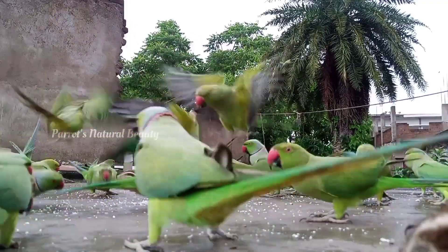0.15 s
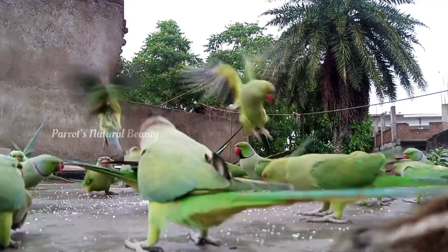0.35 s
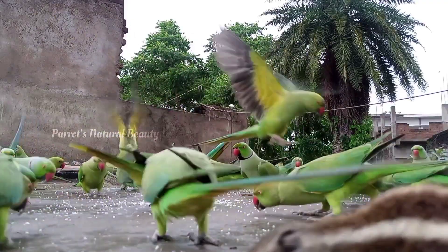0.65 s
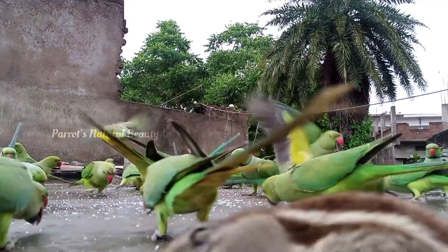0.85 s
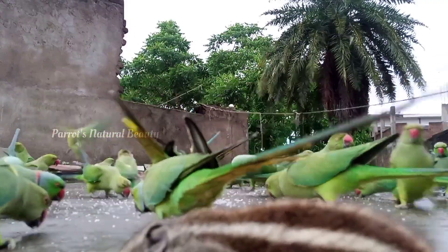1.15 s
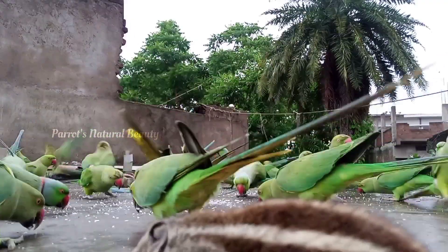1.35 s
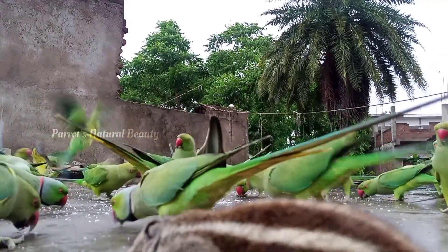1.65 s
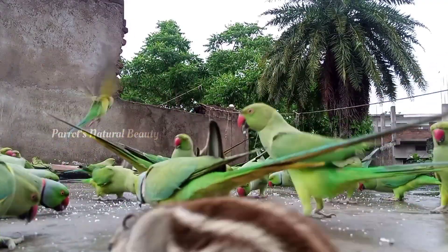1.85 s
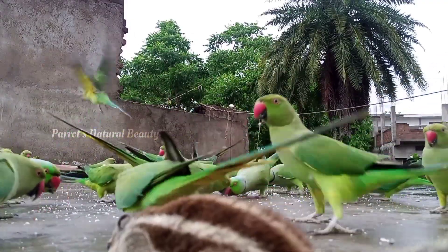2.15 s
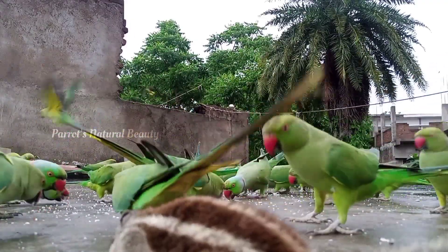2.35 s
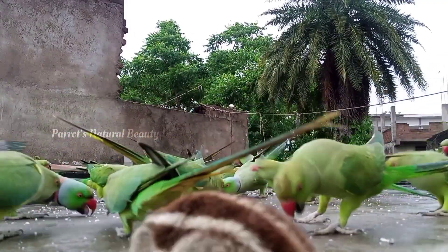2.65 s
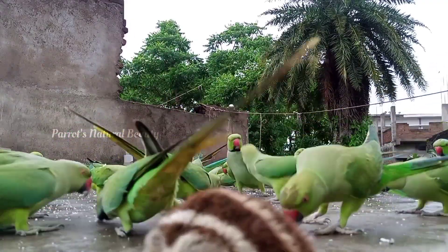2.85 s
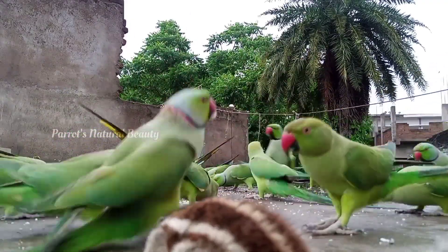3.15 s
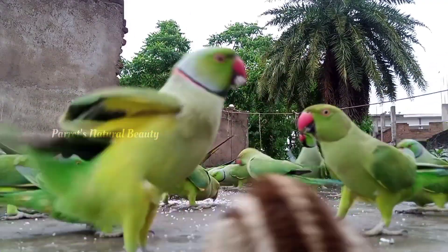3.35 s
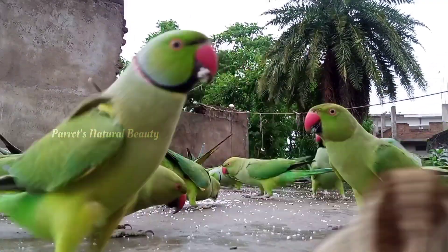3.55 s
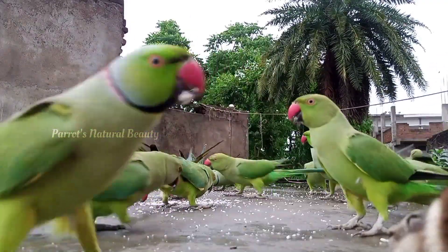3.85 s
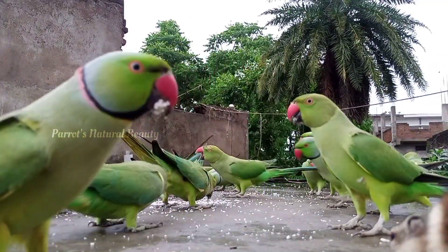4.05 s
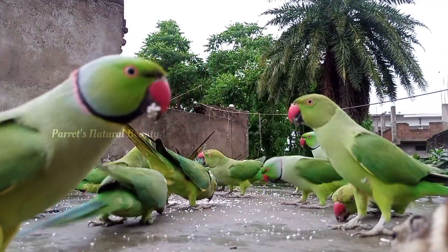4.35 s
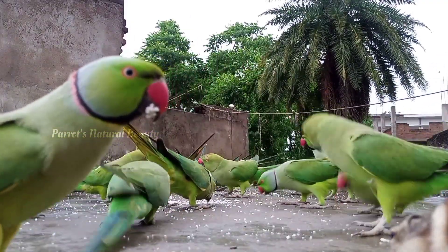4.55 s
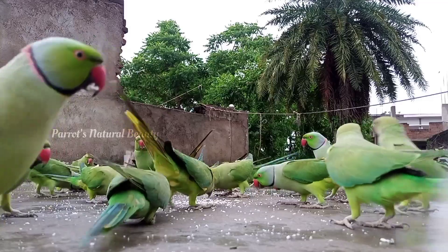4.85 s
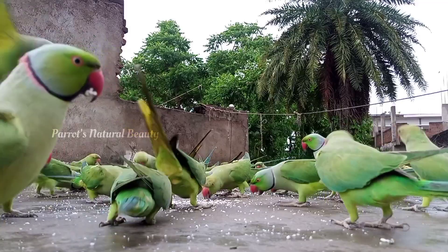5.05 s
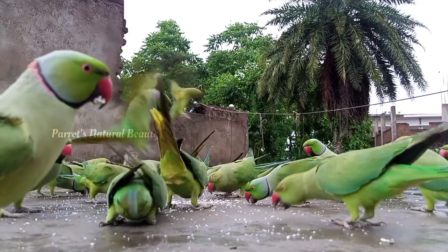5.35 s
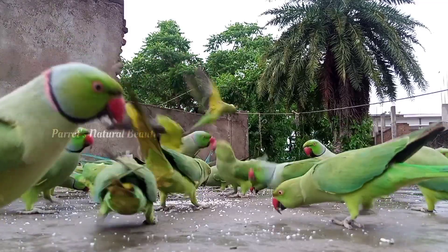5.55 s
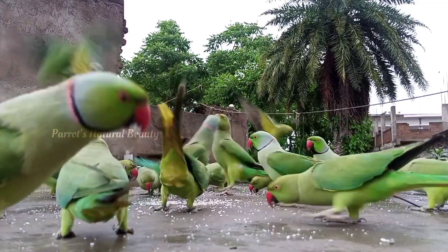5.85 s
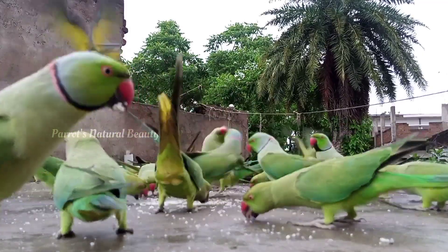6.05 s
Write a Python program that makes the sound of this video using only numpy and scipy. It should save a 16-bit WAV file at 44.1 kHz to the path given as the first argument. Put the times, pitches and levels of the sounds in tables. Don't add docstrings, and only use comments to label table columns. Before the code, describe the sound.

A feeding flock heard by one small microphone set among the birds. Early wing flutter and humming feathers give way to a rasping squawk, then small whistles, a warble and dry husk ticks. The insect whine fades out midway; distant thin cries appear. A burst of wings buffets the microphone with deep thumps, the whine comes back, and low croaks, flaps, a falling screech and a fluttering trill end it.

```python
import sys
import numpy as np
from scipy import signal
from scipy.fft import rfft, irfft, next_fast_len
from scipy.io import wavfile
from scipy.ndimage import uniform_filter1d, map_coordinates

SR = 44100
rng = np.random.default_rng(int(sys.argv[2]) if len(sys.argv) > 2 else 0)


def natural_amplitude(level_db):
    exponent = np.asarray(level_db, float) / 20
    return 10 ** exponent


def wav_out(sig):
    wavfile.write(sys.argv[1], SR, np.round(np.clip(np.atleast_2d(sig).T, -1, 1) * 32767).astype(np.int16))


N = 273420


def unit(x):
    return x / np.sqrt(np.mean(np.abs(x) ** 2) + 1e-20)


def along(points, hz):
    f, v = np.transpose(points)
    return np.interp(np.log(hz + 1), np.log(f + 1), v)


def curves(rows, whole=True):
    s, *cols = np.transpose(rows)
    if whole:
        i = np.arange(N)
    else:
        i = np.arange(int(s[0] * SR), min(N, int(s[-1] * SR)))
    return i, *[np.interp(i / SR, s, c) for c in cols]


def wobble(rate, size=N):
    knots = rng.standard_normal(int(size * rate / SR) + 4)
    return map_coordinates(knots, [np.arange(size) * rate / SR])


def coloured(x, spectrum):
    m = next_fast_len(len(x) + 4096)
    gain = natural_amplitude(along(spectrum, np.fft.rfftfreq(m, 1 / SR)))
    return irfft(rfft(x, m) * gain, m)[:len(x)]


def rush(spectrum, patchy_db):
    z = signal.stft(rng.standard_normal(N), nperseg=512)[2]
    field = uniform_filter1d(rng.standard_normal(z.shape), 6, 0)
    field = uniform_filter1d(field, 8, 1)
    noise = signal.istft(z * natural_amplitude(patchy_db * unit(field)), nperseg=512)[1][:N]
    return unit(coloured(noise, spectrum))


def whistle(pitch, level_db, overtones_db, rough, edge_s=0.0037):
    n = len(pitch)
    phase = 2 * np.pi * np.cumsum(pitch + 90 * rough * wobble(300, size=n)) / SR
    tone = np.zeros(n)
    for k, db in enumerate(overtones_db):
        shake = 1 - 0.56 * rough + rough * (wobble(300, size=n) + 0.31 * wobble(1400, size=n))
        tone += natural_amplitude(db + 4.5) * shake * np.sin((k + 1) * phase)
    nearest_end = np.minimum(np.arange(n), np.arange(n)[::-1])
    return natural_amplitude(level_db) * np.clip(nearest_end / (edge_s * SR), 0, 1) * tone


def glide(s, length, first_hz, last_hz, db, turn, sag, rise_db, fall_db):
    turn = np.clip(turn, .05, .95)
    turn_hz = sag * (first_hz + turn * (last_hz - first_hz))
    start = (s, first_hz, db - rise_db)
    end = (s + length, last_hz, db - fall_db)
    return [start, (s + turn * length, turn_hz, db), end]


def shaped(*flocks):
    calls = []
    for kind, rows in flocks:
        for row in rows:
            corners = glide(*row, kind["turn"], kind["sag"], kind["rise_db"], kind["fall_db"])
            calls.append((corners, kind["overtones_db"], kind["rough"]))
    return calls


MOUTH_HZ = 2050


def sung(calls, dulling=0):
    out = np.zeros(N)
    for corners, overtones_db, rough in calls:
        i, pitch, level_db = curves(corners, whole=False)
        dulled_db = []
        for k, db in enumerate(overtones_db):
            above_hz = np.maximum((k + 1) * pitch - MOUTH_HZ, 0)
            dulled_db.append(db - dulling * above_hz / 1000)
        out[i] += whistle(pitch, level_db, dulled_db, rough)
    return out


# f/Hz, level/dB (per Hz)
TOWN_COLOUR = [(60, -19), (100, -1), (155, 1), (370, -9.5), (800, -14), (1500, -9.5), (2300, -16.5),
               (2900, -22), (3250, -22.5), (3700, -24.5), (4200, -22), (4900, -29), (6400, -32.5),
               (7800, -44), (10000, -73)]
# t/s, level/dB
TOWN_LEVEL = [(0.0, -65), (0.45, -66), (1.5, -67.5), (3.0, -68.5), (3.49, -68.5), (3.78, -67.5),
              (4.73, -68.5), (5.09, -65.5), (5.7, -64.5), (5.94, -64.5), (6.2, -61.5)]


def town():
    _, level_db = curves(TOWN_LEVEL)
    hiss = natural_amplitude(-101 + 2.2 * wobble(28)) * rng.standard_normal(N)
    return natural_amplitude(level_db + 2.0 + wobble(6.6)) * rush(TOWN_COLOUR, patchy_db=2.0) + hiss


# t/s, half width/s, level/dB
GUSTS = [(.3, 0.083, -54), (0.568, 0.079, -52.5), (.95, 0.064, -56), (3.6, 0.025, -54),
         (3.77, 0.067, -49.5), (3.9, 0.086, -40.5), (4.1, 0.14, -49.5), (4.239, 0.036, -56),
         (4.4, 0.017, -62.5), (4.999, 0.061, -65.5), (5.32, 0.029, -60)]
# f/Hz, level/dB (per Hz)
RUMBLE = [(15, -39.5), (35, -5.5), (70, 5), (110, -2.5), (170, -18), (280, -29.5), (450, -72)]
# t/s, peak level/dB, swing f/Hz, half width/s
THUMPS = [
    (4.0157, -20.5, 116, 0.0032),
    (4.033, -16, 122.3, 0.0068),
    (4.061, -27.5, 128, 0.0045),
    (4.094, -34.5, 97, 0.025),
    (3.805, -32.5, 81, 0.0086),
    (3.851, -36.5, 106, 0.0048),
    (3.957, -31.5, 93, 0.0043),
]


def air():
    t = np.arange(N) / SR
    strength = natural_amplitude(-75.5) * np.ones(N)
    for s, width, db in GUSTS:
        strength += natural_amplitude(db) * np.exp(-((t - s) / width) ** 2)
    out = strength * unit(natural_amplitude(0.75 * wobble(18)) * rush(RUMBLE, patchy_db=4.0))
    for s, db, hz, width in THUMPS:
        swell = np.exp(-((t - s) / width) ** 2)
        out -= natural_amplitude(db) * swell * np.cos(2 * np.pi * hz * (t - s))
    return out


# t/s, level/dB, centre f/Hz
CICADAS = [(0.0, -51, 3668), (0.21, -53, 3720), (0.48, -48.5, 3673), (0.74, -50.5, 3676), (1.07, -51, 3694),
           (1.23, -47, 3600), (1.33, -52.5, 3659), (1.59, -49, 3657), (2.09, -69.5, 3658),
           (2.26, -85.5, 3645), (3.0, -102, 3637), (3.83, -80, 3556), (3.97, -52, 3600), (4.11, -47, 3696),
           (4.23, -49, 3620), (4.66, -57, 3570), (5.16, -58, 3580), (5.44, -63, 3565), (6.2, -68.5, 3700)]
# pitch ratio, width f/Hz, level/dB
CHORUS = [(.905, 86.4, -15.5), (0.988, 39.3, -5), (1.015, 54.7, -4), (1.09, 109.5, -13.5),
          (1.17, 149.7, -23.5), (1.01, 204, -5)]


def cicadas():
    _, level_db, centre = curves(CICADAS)
    song = np.zeros(N)
    centre = centre * (1 + .007 * wobble(13))
    for ratio, width, db in CHORUS:
        phase = 2 * np.pi * np.cumsum(centre * ratio * (1 + 0.0071 * wobble(5))) / SR
        pole = np.exp(-2 * np.pi * width / SR)
        tremble = signal.lfilter([1], np.poly([pole, pole, pole]), rng.standard_normal((2, N)))
        voice = unit(tremble[0] * np.cos(phase) + tremble[1] * np.sin(phase))
        song += natural_amplitude(db + 0.68 * wobble(6.5)) * voice
    return natural_amplitude(level_db) * unit(song * natural_amplitude(0.16 * wobble(120)))


# f/Hz, level/dB (per Hz)
GROVE_COLOUR = [(2900, -29), (3350, 1.5), (3700, 5), (4100, 2), (4600, -36.5)]
# t/s, level/dB
GROVE_LEVEL = [(0, -67.5), (2.1, -72.5), (2.7, -78.5), (3.8, -81), (4.6, -68.5), (5.3, -68), (6.2, -68.5)]


def grove():
    return natural_amplitude(curves(GROVE_LEVEL)[1]) * rush(GROVE_COLOUR, patchy_db=2.5)


# t/s, length/s, feather rush level/dB, air push level/dB
FLAPS = [(0.159, 0.019, -57.5, -70), (3.668, .015, -60.5, -72), (0.192, 0.098, -57.5, -73),
         (0.268, 0.047, -42.5, -45), (0.313, 0.036, -51.5, -46), (0.352, 0.039, -49, -42.5),
         (0.425, 0.077, -58, -49.5), (0.534, 0.077, -54.5, -49.5), (0.611, 0.07, -57, -49.5),
         (0.708, 0.17, -60.5, -62), (0.802, 0.02, -53, -52), (0.932, 0.21, -67, -60.5),
         (1.482, 0.029, -62.5, -98), (1.925, 0.054, -64, -66.5), (1.949, 0.021, -75, -60),
         (3.689, 0.11, -64.5, -65), (3.797, 0.02, -66, -52), (3.867, 0.063, -53, -45),
         (3.933, 0.016, -54, -35), (3.945, 0.099, -53.5, -45.5), (4.043, 0.047, -64, -45.5),
         (4.083, 0.058, -60.5, -81), (4.843, 0.16, -64, -66), (4.992, 0.051, -53.5, -65),
         (5.031, 0.074, -57, -49.5), (5.107, 0.11, -54, -55), (5.276, 0.08, -65, -68),
         (5.335, 0.092, -56.5, -49), (5.54, 0.064, -65, -60.5), (5.702, 0.14, -71, -60),
         (5.882, 0.08, -77, -55.5), (6.042, 0.026, -63, -55.5)]
# f/Hz, level/dB (per Hz)
FEATHERS = [(300, -15.5), (500, 2.5), (1000, -1), (1830, -1), (2670, -12.5), (3720, -6), (5120, -25.5),
            (6200, -25.5), (8500, -43), (12500, -59), (15800, -53)]
# f/Hz, level/dB (per Hz)
PUSH = [(90, -44.5), (170, -4), (280, 2.5), (400, -7), (600, -23), (900, -69)]


def wings():
    feather, push = np.zeros(N), np.zeros(N)
    t = np.arange(N) / SR
    for s, length, rush_db, push_db in FLAPS:
        swell = np.exp(-(2.34 * (t - s) / length) ** 2)
        feather += natural_amplitude(rush_db) * swell
        push += natural_amplitude(push_db) * swell
    grain = unit(natural_amplitude(2.3 * wobble(300) + 2.2 * wobble(70)))
    return feather * grain * rush(FEATHERS, patchy_db=3.5) + push * rush(PUSH, patchy_db=1.5)


# f/Hz, level/dB
TONE_COLOUR = [(200, -1.5), (4600, 4.5), (5300, -1.5), (6300, 2), (6900, -10), (7200, -34), (8800, -47)]
# roughness, overtone levels/dB, turn (share of length), pitch sag, rise and fall/dB
HUM = dict(rough=0.18, overtones_db=[-2.5, -24.5], turn=0.65, sag=1.032, rise_db=2.5, fall_db=3)
# t/s, length/s, first f/Hz, last f/Hz, level/dB
HUMS = [
    (.29, 0.06, 326, 303, -48.5),
    (0.401, 0.056, 321.4, 346, -44),
    (.575, .08, 296.6, 350, -51),
    (5.17, 0.091, 215, 215.6, -55.5),
    (5.385, 0.034, 220, 244, -40.5),
    (5.449, 0.046, 415, 426.5, -52),
    (5.849, 0.092, 227.3, 214, -51.5),
]


def feather_hums():
    return coloured(sung(shaped((HUM, HUMS))), TONE_COLOUR)


# f/Hz, time/s
WALLS = [(300, 0.2), (2000, 0.12), (6000, 0.26), (12000, 0.027)]


def walls(x):
    hz, t, z = signal.stft(rng.standard_normal(SR // 2), SR, nperseg=256)
    decay = natural_amplitude(-60 * t / along(WALLS, hz)[:, None])
    tail = signal.istft(z * decay, SR, nperseg=256)[1]
    delayed = np.pad(x, (400, 0))
    return signal.fftconvolve(delayed, tail / np.linalg.norm(tail))[:N]


# t/s, f/Hz, level/dB
SQUAWK = [
    (.857, 1224, -35),
    (.865, 1286, -31),
    (.872, 1312, -26),
    (.893, 1312, -23),
    (.903, 1091, -22.5),
    (.93, 1039, -23.5),
    (.973, 975, -30.5),
    (.98, 995, -56.5),
]
# f/Hz, level/dB (per Hz)
THROAT = [(450, -41), (750, -14.5), (1150, -6), (1400, 0.5), (1700, -4), (2050, -0.5), (2700, -7),
          (3250, -8), (4100, -10.5), (4900, -19), (7500, -33.5), (9000, -51), (11500, -49), (15800, -59)]
# f/Hz, level/dB
SIDE_BRANCH = [(2900, 0), (3280, -15), (3700, 0)]
# t/s, level/dB
CHOP = [(.855, 4), (.925, 3.5), (.945, 1.5)]


def squawk():
    i, pitch, level_db = curves(SQUAWK, whole=False)
    n = len(i)
    chop = np.cos(2 * np.pi * (139 * (i / SR - .8715) + 0.049 * wobble(48.9, size=n)))
    bent = pitch * (1 + 0.18 * chop + 0.055 * wobble(400, size=n))
    phase = 2 * np.pi * np.cumsum(bent) / SR
    voice = np.zeros(n)
    for k in range(1, 12):
        db = -7 * (k == 3) + 2.9 * (k == 4) + 2.2 * (k > 1) * wobble(505, size=n)
        voice += natural_amplitude(db) * np.cos(k * phase + 2.1 * k * k)
    halfway = np.cos(3 * phase / 2) + np.cos(5 * phase / 2)
    voice = unit(voice) + natural_amplitude(-9.5) * halfway
    share = .2
    source = np.sqrt(1 - share) * voice + np.sqrt(share) * rng.standard_normal(n)
    gate = natural_amplitude(np.interp(i / SR, *np.transpose(CHOP)) * chop)
    call = coloured(coloured(source * gate, THROAT), SIDE_BRANCH)
    onset = np.clip((i - i[0]) / (.004 * SR), 0, 1)
    out = np.zeros(N)
    out[i] = natural_amplitude(level_db) * onset * unit(call)
    return out


# t/s, peak level/dB, centre f/Hz
TICKS = [(1.247, -38, 1940), (1.3776, -64.5, 5897), (1.442, -53.5, 5800), (1.442, -45, 1630),
         (1.456, -63, 6460), (1.468, -67, 6016), (1.48, -46.5, 1830), (2.01, -65, 5600),
         (2.54, -51.5, 1950), (2.881, -61, 3540), (3.243, -47, 1790), (3.276, -57.5, 3500),
         (3.277, -60, 4900), (3.277, -65.5, 13050), (3.277, -83, 8950), (3.317, -81, 6040),
         (3.445, -78, 11900), (4.0911, -50.5, 5360), (4.091, -59, 1600), (4.518, -54, 1800),
         (4.62, -47, 3700)]


def ticks():
    out, t = np.zeros(N), np.arange(SR // 100) / SR
    for s, db, hz in TICKS:
        ring = np.sin(2 * np.pi * hz * t + wobble(0.35 * hz, size=len(t)))
        fade = natural_amplitude(db + 2.0 - 60 * t / 0.012)
        out[round(s * SR):][:len(t)] += fade * (1 - np.exp(-t / 0.00022)) * ring
    return out


# t/s, length/s, first f/Hz, last f/Hz, level/dB.
CHUCK = dict(rough=0.29, overtones_db=[-4, -1, -20.5, -28.5],
         turn=0.38, sag=.88, rise_db=-1.5, fall_db=12.5)
CHUCKS = [
    (2.961, 0.045, 754, 777, -44.5),
]
SLIDE = dict(rough=0.099, overtones_db=[-1.5, -2.5, -7.5], turn=0.57, sag=0.93, rise_db=14, fall_db=5)
SLIDES = [
    (2.901, 0.09, 656, 469, -55),
]
HOOT = dict(rough=0.055, overtones_db=[-17.5, -1.3, -8, -17], turn=0.5, sag=0.97, rise_db=-3, fall_db=4.5)
HOOTS = [
    (2.366, 0.049, 509, 523, -52.5),
]
MUTTER = dict(rough=0.41, overtones_db=[1.5, -5, -17, -31], turn=0.54, sag=0.94, rise_db=2.5, fall_db=7)
MUTTERS = [
    (4.78, 0.0715, 421, 477, -62.5),
    (5.165, 0.07, 685, 725, -61),
]
PIP = dict(rough=0.19, overtones_db=[-4], turn=0.23, sag=1, rise_db=3.5, fall_db=2)
PIPS = [(1.81, 0.1, 2700, 2564, -70), (1.79, 0.019, 1930, 1800, -49.5), (1.87, 0.016, 1740, 1760, -45),
        (2.155, 0.036, 2420, 2515, -62.5), (2.77, 0.017, 2130, 2600, -59), (3.78, 0.07, 2430, 1800, -62),
        (4.226, 0.065, 1160, 1200, -61), (4.366, 0.055, 2230, 2080, -69), (4.148, 0.075, 2250, 2400, -66),
        (4.285, 0.096, 720, 715, -68.5), (4.435, 0.043, 720, 810, -77), (4.4, .055, 730, 700, -74),
        (4.7, 0.044, 970, 1800, -58.5), (6.8, 0.13, 680, 950, -62), (4.53, 0.038, 1100, 1200, -68.5),
        (2.5, .034, 750, 760, -56.5), (3.17, 0.11, 800, 870, -69), (3.045, .03, 1000, 990, -63.5),
        (3.045, .03, 1700, 1960, -66), (5.01, 0.059, 1900, 2000, -59.5), (2.736, 0.018, 2750, 2850, -63.5),
        (3.462, 0.025, 4150, 3600, -76), (3.503, 0.025, 2800, 2900, -79), (3.73, .05, 2200, 2100, -66),
        (3.205, 0.028, 1950, 1800, -65)]
# t/s, f/Hz, level/dB.
WARBLE = [
    (1.658, 1871, -55),
    (1.672, 1325, -51.5),
    (1.682, 1283, -53.5),
    (1.696, 1700, -45),
    (1.708, 1790, -46),
    (1.718, 1186, -44.5),
    (1.726, 1070, -41),
    (1.743, 1265, -45.5),
]
UPSWEEP = [
    (2.789, 980, -40),
    (2.8, 922, -41),
    (2.815, 1086, -45.5),
    (2.828, 1220, -48.5),
]
TUMBLE = [
    (2.695, 810, -57.5),
    (2.716, 771, -47),
    (2.736, 591, -46),
    (2.77, 562, -58),
]
SCREECH = [
    (5.713, 1566, -58.5),
    (5.738, 1680, -49),
    (5.744, 2230, -54.5),
    (5.752, 2430, -50.5),
    (5.78, 2104, -48),
    (5.855, 1170, -55),
]


def chirps():
    ajar = [(UPSWEEP, [-5.5, 3.5, 7.5, 11.5], .2)]
    shut = [(WARBLE, [-1.4, .5], .2), (TUMBLE, [-6, -3, -4], .08)]
    shut += shaped((SLIDE, SLIDES))
    wide = [(SCREECH, [-4.5, -3, -11.5, -8.5, -16], .35)]
    wide += shaped((CHUCK, CHUCKS), (HOOT, HOOTS), (MUTTER, MUTTERS), (PIP, PIPS))
    return coloured(sung(ajar, dulling=24) + sung(shut, dulling=70) + sung(wide), TONE_COLOUR)


# roughness, overtone levels/dB, turn (share of length), pitch sag, rise and fall/dB
CRY = dict(rough=0.47, overtones_db=[0, -22], turn=0.22, sag=1, rise_db=-2.5, fall_db=11)
SEEP = dict(rough=.6, overtones_db=[0], turn=.3, sag=1, rise_db=3, fall_db=14)
# t/s, length/s, first f/Hz, last f/Hz, level/dB
CRIES = [(2.603, .018, 3430, 3650, -60), (2.619, 0.12, 3140, 2970, -67.5), (2.71, 0.03, 3400, 3370, -56),
         (3.623, 0.046, 3460, 3590, -59.5), (3.655, 0.082, 2880, 3050, -66), (3.68, 0.046, 3170, 3270, -67),
         (3.73, 0.037, 3363, 3350, -51), (4.781, 0.028, 3920, 4000, -55), (5.703, 0.037, 3960, 4020, -60),
         (5.738, 0.073, 3530, 3570, -53.5), (5.848, 0.15, 2907, 2946, -57), (5.906, 0.15, 2090, 2000, -54),
         (6.1, 0.11, 3940, 3720, -55)]
SEEPS = [
    (2.597, 0.02, 5630, 5470, -63.5),
    (2.74, 0.042, 5500, 5700, -77),
    (2.794, 0.015, 5600, 5600, -73.5),
    (3.559, .13, 5340, 5420, -83),
    (3.745, .05, 5420, 5670, -78),
    (3.6, 0.087, 5650, 5800, -69),
    (4.784, 0.1, 5090, 5070, -64),
]
# t/s, f/Hz, level/dB
DESCENT = [
    (4.818, 3530, -48),
    (4.835, 3460, -54),
    (4.865, 3375, -64),
    (4.888, 3080, -61),
    (4.925, 2966, -55.5),
    (4.98, 2890, -64),
]


def far_calls():
    calls = shaped((CRY, CRIES), (SEEP, SEEPS)) + [(DESCENT, [0, -15], .3)]
    direct = coloured(sung(calls), TONE_COLOUR)
    return natural_amplitude(-2.5) * direct + natural_amplitude(-9.5) * walls(direct)


# roughness, overtone levels/dB, turn (share of length), pitch sag, rise and fall/dB
CROAK = dict(rough=.18, overtones_db=[-2, 0, 2, 1, 0, -1], turn=.45, sag=.9, rise_db=-1, fall_db=9)
# t/s, length/s, first f/Hz, last f/Hz, level/dB
CROAKS = [
    (3.25, .031, 810, 373, -57),
    (3.478, 0.03, 822, 392, -55),
    (5.314, 0.0359, 458, 359, -58.5),
]
# t/s, f/Hz, level/dB
GRUMBLES = [
    [(5.255, 614, -64), (5.276, 476, -59.5), (5.29, 461, -51), (5.308, 460, -51)],
    [(5.063, 601, -56), (5.075, 579, -54), (5.097, 534.5, -53), (5.138, 498, -65.5)],
    [(4.94, 820, -59), (4.97, 687, -59), (5.005, 595, -59)],
]
# f/Hz, level/dB
CROP = [(200, -28), (550, 0.5), (950, -7.5), (1450, 2), (1750, -3), (2200, -11.5), (2800, -31)]


def croaks():
    grumbles = [(corners, [4, -2, 2, -5], .45) for corners in GRUMBLES]
    return coloured(sung(shaped((CROAK, CROAKS)) + grumbles), CROP)


# t/s, mean f/Hz, level/dB, pitch swing (share)
TRILL = [
    (6.066, 1318, -61, 0.003),
    (6.082, 1578, -46.5, 0.0089),
    (6.098, 1876, -53, 0.065),
    (6.122, 2076, -47, 0.062),
    (6.138, 1918, -47, 0.18),
    (6.148, 1648, -51.5, .19),
    (6.17, 1575, -51, 0.2),
    (6.199, 1456, -59.5, 0.17),
]
# f/Hz, level/dB
TRILL_NOTCH = [(3120, 0), (3430, -12), (3750, 0)]


def trill():
    swing_hz, middle_hz = 47.7, 1730
    out = np.zeros(N)
    i, pitch, level_db, depth = curves(TRILL, whole=False)
    pitch = pitch * (1 + depth * np.cos(2 * np.pi * swing_hz * (i / SR - 6.137)))
    height = np.log(pitch / middle_hz)
    overtones_db = [-8 + 15 * height, -5 - 25 * height, -16, -18 - 18 * height]
    out[i] = whistle(pitch, level_db, overtones_db, rough=0.6)
    return coloured(coloured(out, TRILL_NOTCH), TONE_COLOUR)


def scene():
    backdrop = town() + air() + cicadas() + grove() + wings()
    flock = feather_hums() + squawk() + ticks() + chirps() + croaks() + trill()
    mono = backdrop + flock + natural_amplitude(-14.5) * walls(flock) + far_calls()
    return np.array([mono, mono])


def top_cut(x):
    return signal.sosfilt(signal.butter(12, 15940, fs=SR, output="sos"), x)


# f/Hz, level/dB
CAPSULE = [(20, -11), (45, -5.5), (80, -4), (13300, 0.5), (14300, 11.5), (15300, 19.5), (16500, 12)]
# f/Hz, level/dB
BAND_EDGE = [(15870, 0), (15950, -60)]


def record(dry):
    mix = np.array([coloured(coloured(x, CAPSULE), BAND_EDGE) for x in dry])
    return top_cut(mix)


dry = scene()
out = record(dry)
wav_out(out)
```